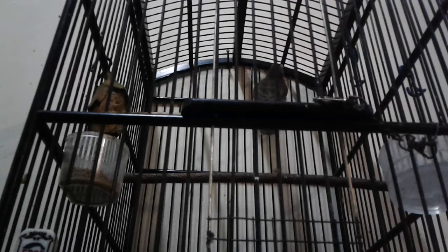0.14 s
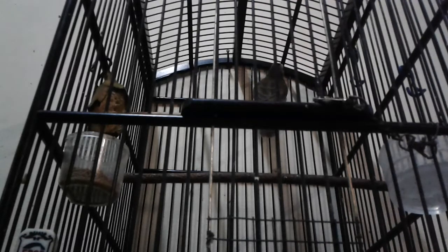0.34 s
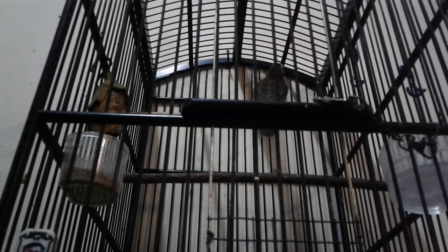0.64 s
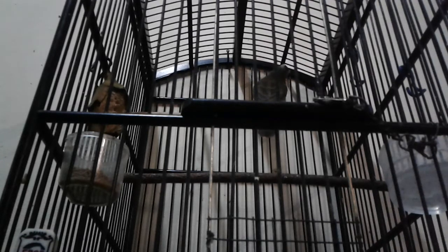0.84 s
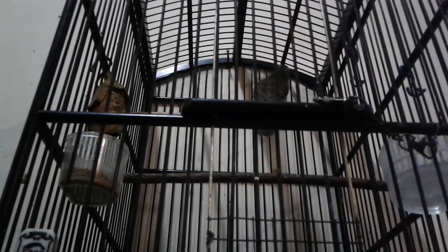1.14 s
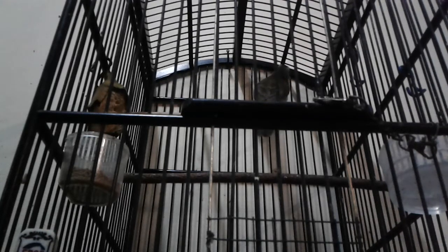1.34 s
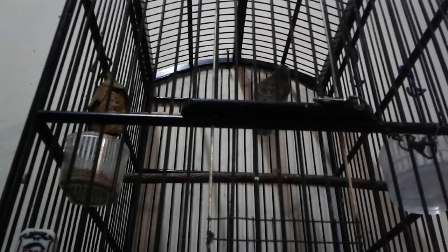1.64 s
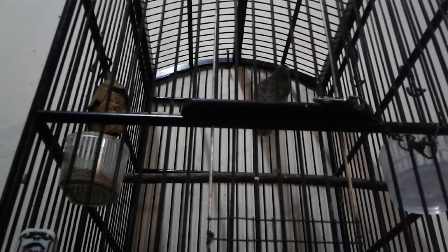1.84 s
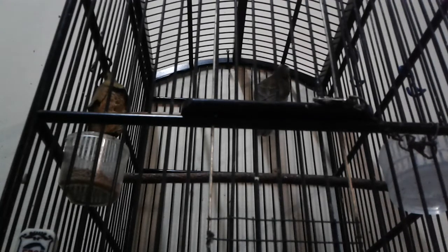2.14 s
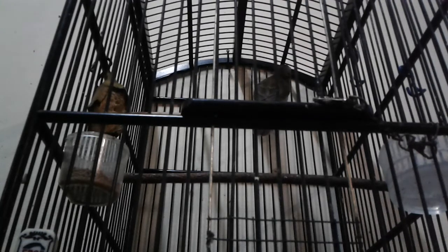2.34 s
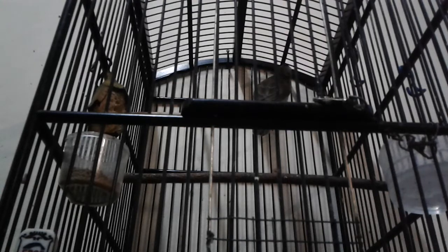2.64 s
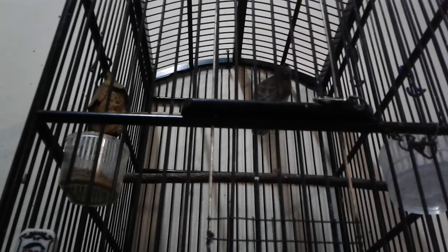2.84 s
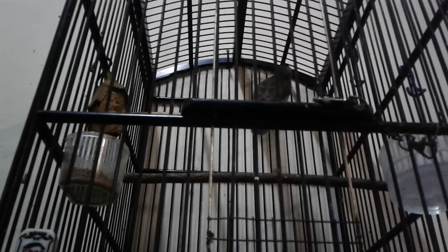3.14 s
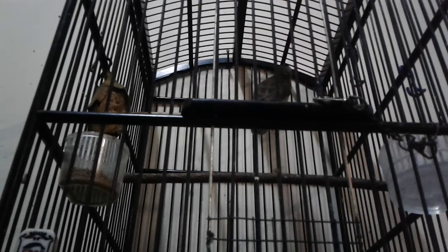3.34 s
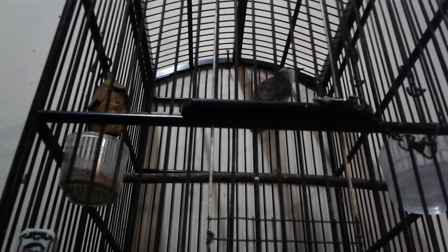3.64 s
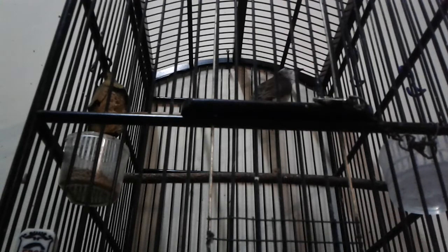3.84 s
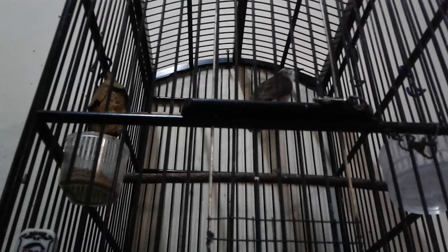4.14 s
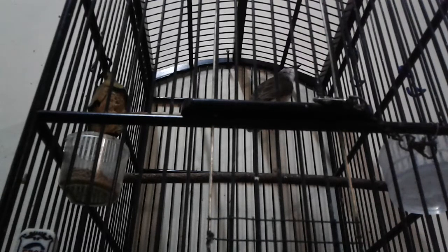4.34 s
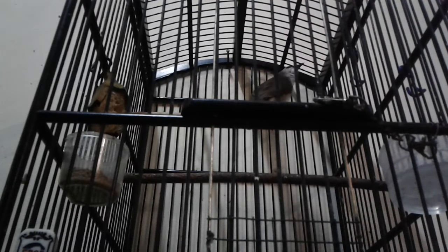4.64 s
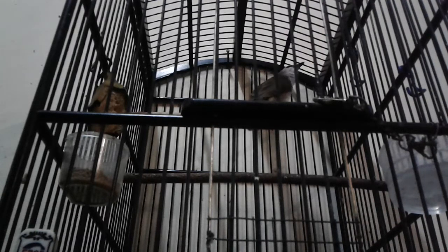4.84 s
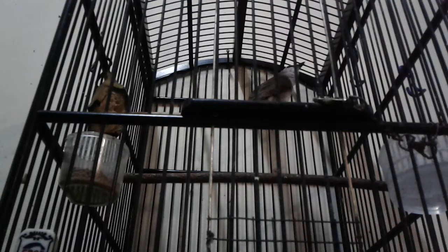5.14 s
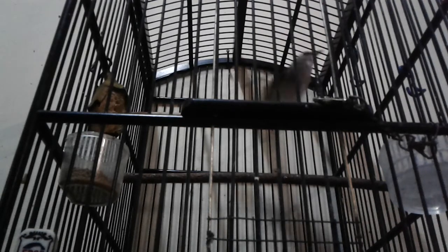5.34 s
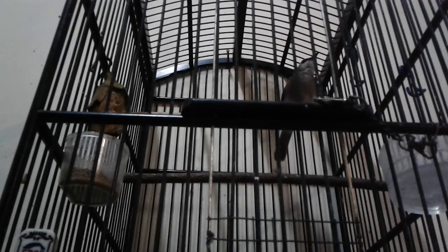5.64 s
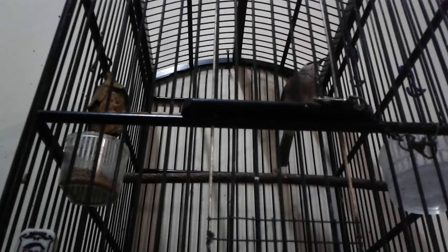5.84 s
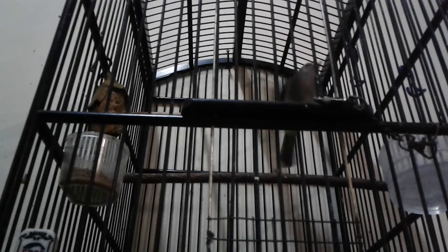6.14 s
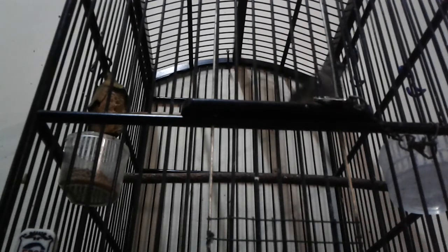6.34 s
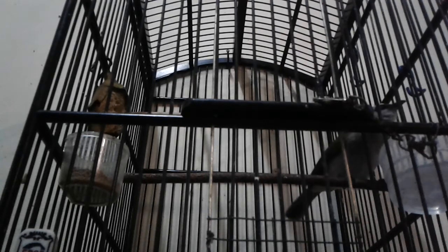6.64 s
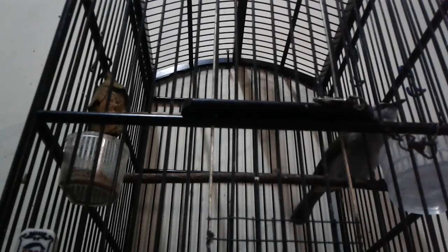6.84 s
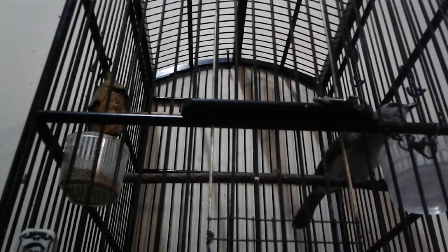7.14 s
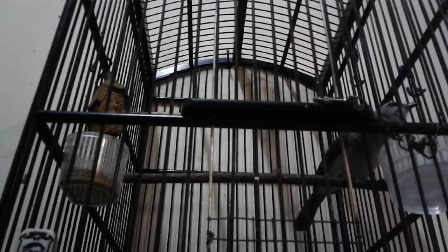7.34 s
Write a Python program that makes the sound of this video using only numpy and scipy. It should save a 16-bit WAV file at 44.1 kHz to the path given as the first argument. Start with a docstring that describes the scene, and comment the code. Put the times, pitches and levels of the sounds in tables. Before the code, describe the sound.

A caged songbird sings close to the microphone in a small hard-walled room with quick wall echoes and a short bright ring. From 0 to about 1.65 seconds it rattles off five similar phrases, roughly every 0.37 seconds: sharp noisy chip, high pip, loud downward slur, soft rise, raspy two-voiced twang and low fading drop; the first begins already underway. Between 1.85 and 2.75 another bird gives four faint rising-falling calls far off. Near-silence follows, with low air, distant traffic easing after 3, a faint sinking engine whine early, hum and wavering hiss. Slower whistles come at 3.75, 4.45 and 4.77-5.25, sweeping down, then swelling into rounded crests, the last loudest. A very faint distant chirp falls at 5.6. At 6.4-6.55 a hop makes tiny dry ticks, and a weak two-part falling whistle sounds at 6.7-6.8 before quiet room tone to about 7.5.

```python
"""In a hard-walled room a caged bulbul sings close by, over still air, distant traffic, a hum and hiss.
Five quick phrases are built of chip, pip, slur, lead, twang and drop; slower whistles follow, built of
sweep, slide, trough and arch. Each syllable is a gliding tone with faint overtones; the twang joins two.
Chips and twangs add bursts of noise, a hop gives dry ticks, and another bird calls faintly from afar.
Delayed copies form the first wall echoes, and decaying noise forms the ring of the room."""
import sys
import numpy as np
from scipy import signal
from scipy.fft import rfft, irfft, next_fast_len
from scipy.io import wavfile
from scipy.ndimage import uniform_filter1d

SR = 44100
rng = np.random.default_rng(int(sys.argv[2]) if len(sys.argv) > 2 else 0)


def master_out(mix):
    """Clip the mix to full scale and print it as 16-bit PCM to the path in sys.argv[1]."""
    frames = np.transpose(np.atleast_2d(mix))
    ceiling = np.clip(frames, -1, 1)
    pcm = np.round(ceiling * 32767).astype(np.int16)
    wavfile.write(sys.argv[1], SR, pcm)


N = 329427
TIME = np.arange(N) / SR  # seconds

# Noise colours, each scaled later to rms 1. Each row: frequency in Hz, relative density in dB.
AIR_COLOUR = [(15, -52.5), (25, -25.5), (48, -17.5), (115, -4), (152, -8), (205, -6.5), (350, -13.5),
              (500, -18), (1100, -28), (2000, -34), (2800, -31.5), (4300, -34.5), (9000, -63.5)]
HIGH_HISS_COLOUR = [(6000, -10), (9000, -9.5), (11000, -4.5), (13500, 0), (16000, 1)]
TRAFFIC_COLOUR = [(20, -51), (40, -30.5), (75, -7), (105, -15), (122, -0.5), (145, -9.5), (250, -12.5),
                  (450, -20), (900, -20), (2000, -16.5), (3500, -47.5)]
HISS_COLOUR = [(3000, -11.5), (4500, -6.5), (5400, 0.5), (6200, -3.5), (7000, -3.5), (7900, -11.5),
               (8800, -34.5)]
SIZZLE_COLOUR = [(2800, -26.5), (3500, 3), (4000, 3.5), (4500, -7), (5200, -35)]  # a lower band of hiss
SHRILL_COLOUR = [(4300, -37.5), (5050, -7.5), (5400, -2), (5750, -9), (6500, -37.5)]  # a thin far-off shrilling
KNOCK_COLOUR = [(900, -14), (1700, 8), (3000, -3), (5000, -12), (7500, 3), (11000, -14), (16000, -4)]  # claws on perch and bars
RASP_COLOUR = [(600, -12.5), (1500, -1), (3300, 14), (4500, 2), (5000, -3.5), (7700, -8), (8700, -22),
               (10200, -0.5), (11300, -6), (12600, -11.5), (13400, -18), (16000, -20)]

# Slow level curves of the background. Each row: time in seconds, level in dB.
TRAFFIC_LEVEL = [(0, -57.5), (.8, -55.5), (1.3, -55), (1.75, -53), (2.2, -56.5), (2.6, -56), (3.1, -70),
                 (4.4, -64.5), (5.1, -55.5), (5.7, -64), (6.4, -71.5), (7.47, -65)]
HISS_LEVEL = [(0, -72), (.7, -62.5), (1.75, -77.5), (2.0, -70.5), (2.8, -65.5), (3.5, -73), (4, -63),
              (4.5, -67.5), (5.3, -60), (5.8, -61.5), (6.15, -70.5), (7.47, -72)]  # before the trim in hiss()
SIZZLE_LEVEL = [(0, -72.5), (2, -66.5), (3.3, -87.5), (4.5, -70), (5.6, -61), (6.05, -78), (6.35, -83.5),
                (6.65, -73), (7.1, -69.5), (7.47, -65.5)]
SHRILL_LEVEL = [(0, -89), (2.3, -87), (2.75, -73.5), (3.3, -72), (3.6, -81), (7.47, -80)]  # before its flutter
# A far engine's whine. Each row: time in seconds, pitch in Hz, relative level in dB.
WHINE = [(0, 826, -67), (1.5, 803, -58), (1.9, 780, -57.5), (2.3, 711, -63.5), (2.6, 684, -68),
         (3, 675.4, -79.5), (7.47, 670, -97.5)]

# Nearby walls. Each row: echo delay in seconds, reflected share of the amplitude.
WALLS = [(.0031, .28), (.0052, .16), (.0094, .14), (.0128, .25), (.0183, .29), (.0229, .2)]
# Decay of the room. Each row: frequency in Hz, time to fall by 60 dB in seconds.
ROOM_T60 = [(700, 0.78), (1300, 0.72), (2400, 0.72), (5000, .58), (8000, 0.12), (14000, 0.27)]
# How strongly the room rings. Each row: frequency in Hz, gain in dB.
ROOM_COLOUR = [(900, 0), (1180, 1.5), (1450, 1), (1880, 4), (2080, 1.5), (2260, 4.5), (2360, 2),
               (2460, -3.5), (2760, -0.5), (3050, 0), (3450, 2), (10000, 0.5)]

# Overtones of the syrinx. Each row: frequency in Hz, level in dB against the fundamental before richness.
OVERTONES = [(2000, -26.5), (3800, -32), (5300, -47), (7000, -46.5), (8300, -47), (9300, -61.5),
             (10800, -42.5), (12500, -47), (13800, -48), (16000, -51)]
# Brightness as the beak opens and the head turns. Each row: time in seconds, overtone gain in dB.
BEAK = [(0, -10.5), (.7, -7), (1.45, -2.5), (3.8, -3), (4.6, -5), (4.9, -3), (5.2, -0.5), (6.8, -0.5)]
# The octave of a voice strained at the top of its range. Each row: pitch in Hz, octave level in dB.
SQUEAK = [(2900, -69.5), (3250, -34), (3550, -23)]

# Gestures. Each is a pair of lists at even steps through the syllable: pitch from 0 = low to 1 = high,
# then relative level in dB.
FAR_RISE = ([0, 0.48, 0.35, 0.96, 0.84], [0, -3, 0])
FAR_FALL = ([1, 0.567, 0.363, 0.31, 0], [-1, 0, -0.5])
CHIP = ([1, .6, .2, .25, .65, 0.88, 1], [-13.5, -6, -16, -7.5, 0.5, -14.5])  # a flick down and back up
PIP = ([1, 0.96, 0.57, 0.5, 0], [-10, -8.5, 0])  # high, then falling
SLUR = ([0.86, .5, .15, 0.0078, .08], [-9.5, 0, -1.4])  # a loud fall that flattens out
LEAD = ([.1, .2, .45, .6, 1], [-4, -3, 0])  # a soft rise before the twang
SCOOP = ([0.299, 0.071, .12, .5, 1], [-9, -15, 0])  # the side of the syrinx that dips, then rises in the twang
PLUNGE = ([.85, 0.96, .7, .4, 0], [-12.5, 0, -1])  # the side that plunges just after
DROP = ([0.94, 0.99, .75, .4, 0], [0, -7.5, -21])  # the low fading end of a phrase
SWEEP = ([0.99, .8, .6, 0.25, 0.014], [-11.5, 0, -6])  # the long fall that opens a whistle
SLIDE = ([0.94, 0.71, 0.51, .25, 0.061], [-10, 0, -5])  # a short swelling fall
TROUGH = ([.8, .4, 0, .1, 1], [-2, -3, 0])  # the low link from slide to arch
ARCH = ([0, .9, 1, 1, .88, .5, .15, .1], [-4.5, -2, 0])  # the loud crest of a whistle

# The far bird's calls. Each row: start in seconds, level in dB before the room, start Hz, top Hz of the rise.
FAR_CALLS = [(1.858, -46.5, 3070, 3550), (2.100, -49, 2800, 3435), (2.346, -48.5, 2577, 3514),
             (2.610, -49, 2730, 3260)]
# Its one sweep: start in seconds, length in seconds, low Hz, high Hz, level in dB before the room.
FAR_SWEEP = (5.585, .032, 1400, 2200, -44)
# Claws and feathers against the cage. Each row: start in seconds, level in dB before the trim in hop().
TICKS = [(6.3979, -59.5), (6.419, -63), (6.4688, -63.5), (6.507, -52.5), (6.5508, -73)]

# Plain syllables. Each row: start in seconds, length in seconds, low Hz, high Hz, level in dB.
PIPS = [(-.012, 0.02, 3171, 3350, -19), (.293, 0.031, 3393, 3500, -26.5), (.673, 0.0075, 3120, 3330, -17),
        (1.064, .012, 3200, 3386, -17), (1.434, 0.031, 3376, 3667, -28)]
LEADS = [(.065, 0.026, 1768, 1931, -25), (.410, 0.023, 1807, 2013, -26.5), (.776, 0.022, 1710, 1921, -23.5),
         (1.151, .024, 1343, 1940, -24), (1.523, 0.021, 1898, 2067, -26)]
DROPS = [(.134, 0.044, 798, 1177, -26.5), (.479, .051, 854, 1183, -28), (.853, 0.043, 759.8, 1183, -28.5),
         (1.245, 0.028, 1030, 1368, -22), (1.596, 0.045, 773, 1179, -28)]
TROUGHS = [(3.833, .018, 1990, 2287, -29), (4.574, .017, 2160, 2220, -24.5),
           (5.186, .022, 2074, 2328, -18.5)]
# Chips. Each row: the same five columns, then the rasp level in dB as fed to the room.
CHIPS = [(.256, 0.014, 1957, 3078, -12, -51.5), (.624, .019, 1694, 3347, -16.5, -40.5),
         (1.016, .017, 1410, 3230, -21.5, -41), (1.384, 0.0144, 2080, 3197, -14.5, -52.5)]
# Swelling syllables. Each row: the same five columns, delay of the glide (1 = even), swell in dB.
SLURS = [(-.008, 0.034, 2146, 2950, -17.5, 1.2, -8), (.320, .027, 2365, 3070, -17.5, .85, 3),
         (.691, 0.024, 2368, 2960, -10.5, 0.88, 2.5), (1.084, .016, 2320, 3430, -17.5, 1.15, 9.5),
         (1.449, .014, 2290, 3476, -14, 1.48, -8)]
SWEEPS = [(3.744, 0.042, 1250, 2154, -33.5, 0.89, 1.2), (4.466, .036, 1227, 2400, -32, 0.86, 1),
          (4.770, 0.04, 1259, 2147, -25, 1.28, 0), (5.066, .036, 1542, 1890, -24.5, 1.5, 2.5),
          (6.680, .037, 1115, 1845, -32, 2.1, 0)]
SLIDES = [(3.811, 0.02, 2202, 2425, -25.5, 1.56, 3), (4.543, 0.018, 2177, 2550, -24, 1.28, 7),
          (4.857, 0.026, 2015, 2400, -16.5, 1.47, -7), (5.165, .020, 2216, 2586, -13.5, 1.05, 0),
          (6.769, 0.0217, 2047, 2555, -27.5, 0.987, 1)]
ARCHES = [(3.852, 0.041, 2203, 2730, -21.5, 1.04, 4), (4.582, 0.054, 2308, 2750, -22.5, .72, 12),
          (4.909, 0.042, 2308, 2580, -15, .6, 9), (5.205, .046, 2534, 2805, -11.5, 1.4, -2)]
# Twangs. Each row: start in seconds, lag of the plunge in seconds, scoop level in dB, plunge level in dB.
TWANGS = [(.088, .012, -14, -21.5), (.435, 0.0046, -18, -19.5), (.794, .007, -18, -18),
          (1.177, .007, -18.5, -18), (1.547, 0.017, -17.5, -20.5)]


def amp(db):
    """Logarithmic level: decibels become an amplitude factor."""
    return 10 ** (np.asarray(db) / 20)


def unit(x):
    """Normalisation: the mean power is brought to 1."""
    return x / np.sqrt(np.mean(x ** 2) + 1e-20)


def read(points, hz):
    """Interpolation of a spectrum along a log-frequency axis."""
    f, value = np.transpose(points)
    return np.interp(np.log(hz + 1), np.log(f), value)


def follow(rows):
    """Linear interpolation in time: each column of a curve at every sample."""
    s, *columns = np.transpose(rows)
    return [np.interp(TIME, s, column) for column in columns]


def add(mix, s, sound):
    """Superposition: a sound is summed in at time s, less any part before zero."""
    at = round(s * SR)
    sound = sound[max(-at, 0):]
    part = mix[max(at, 0):][:len(sound)]
    part += sound[:len(part)]


def noise(colour):
    """Spectral shaping: white noise is filtered to a given colour at rms 1."""
    size = next_fast_len(N)
    hz = np.fft.rfftfreq(size, 1 / SR)
    spectrum = rfft(rng.standard_normal(size)) * amp(read(colour, hz))
    return unit(irfft(spectrum, size))[:N]


def wander(n, rate_hz):
    """Low-pass filtering: white noise becomes a smooth random drift, scaled to rms 1."""
    size = next_fast_len(max(n, SR // 10))
    hz = np.fft.rfftfreq(size, 1 / SR)
    spectrum = rfft(rng.standard_normal(size)) * np.exp(-(hz / rate_hz) ** 2)
    return unit(irfft(spectrum, size))[:n]


def still_air(air_db=-59, high_hiss_db=-81):
    """Stationary noise: a low-weighted bed of air and a faint high hiss keep constant level."""
    return noise(AIR_COLOUR) * amp(air_db) + noise(HIGH_HISS_COLOUR) * amp(high_hiss_db)


def traffic(firing_hz=117):
    """Noise plus tone: rumble is joined by an engine's firing note of wandering phase."""
    engine = np.sin(2 * np.pi * firing_hz * TIME + 0.68 * wander(N, 4))
    level_db, = follow(TRAFFIC_LEVEL)
    return unit(noise(TRAFFIC_COLOUR) + .5 * engine) * amp(level_db)


def engine_whine():
    """Amplitude modulation: random drift widens a sinking sine into a narrow band."""
    hz, level_db = follow(WHINE)
    carrier = np.sin(2 * np.pi * np.cumsum(hz) / SR)
    return unit(wander(N, 100) * carrier) * amp(level_db)


def hum(hz=199, db=-71):
    """Phase modulation: a steady sine wavers slightly by a slow random phase."""
    return amp(db) * unit(np.sin(2 * np.pi * hz * TIME + 0.69 * wander(N, 3)))


def hiss(trim_db=-2):
    """Band-shaped noise: two bands rise and fall in level independently."""
    hiss_db, = follow(HISS_LEVEL)
    sizzle_db, = follow(SIZZLE_LEVEL)
    return noise(HISS_COLOUR) * amp(hiss_db + trim_db) + noise(SIZZLE_COLOUR) * amp(sizzle_db)


def shrilling(flutter_db=2):
    """Random amplitude modulation: a narrow band of noise flutters in level."""
    level_db, = follow(SHRILL_LEVEL)
    return noise(SHRILL_COLOUR) * amp(level_db + flutter_db * wander(N, 15))


def background():
    """Superposition of independent sources: air, traffic, whine, hum, hiss and shrilling."""
    return still_air() + traffic() + engine_whine() + hum() + hiss() + shrilling()


def walls(x):
    """Specular reflection: each nearby surface returns a delayed, weaker copy."""
    out = np.zeros(N)
    for delay, share in WALLS:
        add(out, delay, share * x)
    return out


def room(x, gap_s=0.0047, build_s=0.015):
    """Reverberation: dense echoes build up, then each band decays at its own rate."""
    hz, t, bands = signal.stft(rng.standard_normal(SR), SR, nperseg=256)
    decay = amp(-60 * t / read(ROOM_T60, hz)[:, None])
    tail = signal.istft(bands * decay, SR, nperseg=256)[1][:SR]
    build_up = np.clip((TIME[:SR] - gap_s) / build_s, 0, 1)
    spectrum = rfft(tail * build_up, 2 * SR)
    spectrum /= np.sqrt(uniform_filter1d(abs(spectrum) ** 2, size=240))  # even, before the colouring
    spectrum *= amp(read(ROOM_COLOUR, np.fft.rfftfreq(2 * SR, 1 / SR)))
    response = irfft(spectrum)[:SR] * (TIME[:SR] > gap_s)
    return signal.fftconvolve(x, response)[:N]


def note(gesture, s, length, low_hz, high_hz, db, delay=1, swell_db=0,
         jitter=0.00092, shimmer=0.039, edge_s=0.0024, pressing=0.086):
    """Frequency modulation with harmonics: louder notes and an open beak enrich the overtones."""
    u = np.linspace(0, 1, int(length * SR))
    pitches, levels = gesture
    # a delay above 1 holds the first pitch longer
    height = np.interp(u ** delay, np.linspace(0, 1, len(pitches)), pitches)
    height = uniform_filter1d(height, size=len(u) // 6, mode="nearest")  # muscles round off the turns
    hz = (low_hz + (high_hz - low_hz) * height) * (1 + jitter * wander(len(u), 200))
    phase = 2 * np.pi * np.cumsum(hz) / SR

    level_db = db + swell_db * (u - .5) + np.interp(u, np.linspace(0, 1, len(levels)), levels)
    edge = np.clip(np.minimum(u, 1 - u) * length / edge_s, 0, 1)
    gate = np.sin(np.pi / 2 * edge) ** 2

    overtones = np.zeros(len(u))
    for k in range(2, 11):
        audible = k * hz < SR / 2  # nothing above half the sample rate
        overtones += amp(read(OVERTONES, k * hz)) * audible * np.sin(k * phase)
    beak_db = np.interp(s, *np.transpose(BEAK))
    richness = amp(beak_db + pressing * (level_db + 16.5))
    squeak = amp(read(SQUEAK, hz)) * np.sin(2 * phase)
    tone = np.sqrt(2) * (np.sin(phase) + richness * overtones + squeak)
    return s, tone * gate * amp(level_db) * (1 + shimmer * wander(len(u), 170))


def far_bird(waver=.033):
    """Frequency modulation: four calls rise and then fall, and a single sweep comes later."""
    rise_s, fall_s, fall_hz = 0.0481, 0.045, (2367, 2800)
    fall_after_s = .063  # from the start of the rise
    out = np.zeros(N)
    for s, db, start_hz, top_hz in FAR_CALLS:
        add(out, *note(FAR_RISE, s, rise_s, start_hz, top_hz, db, jitter=waver))
        add(out, *note(FAR_FALL, s + fall_after_s, fall_s, *fall_hz, db, jitter=waver))
    add(out, *note(SWEEP, *FAR_SWEEP, jitter=waver))
    return out


def hop(trim_db=-3, decay_s=0.0042):
    """Impact excitation: claws and feathers give short, exponentially dying ticks of noise."""
    force, t = np.zeros(N), np.arange(SR // 20) / SR
    for s, db in TICKS:
        add(force, s, amp(db + trim_db) * np.exp(-t / decay_s))
    return force * noise(KNOCK_COLOUR)


def rasp(grain=.3, early_s=0.0015, twang_s=.026, twang_db=-20.5):
    """Chaotic vibration: every chip and twang breaks into a fluttering burst of noise."""
    bursts = [(s - early_s, length, db) for s, length, *_, db in CHIPS]
    bursts += [(s, twang_s, plunge_db + twang_db) for s, *_, plunge_db in TWANGS]
    effort = np.zeros(N)
    for s, length, db in bursts:
        add(effort, s, amp(db) * signal.windows.tukey(int(length * SR), .6))
    flutter = np.exp(grain * wander(N, 400))
    return effort * unit(noise(RASP_COLOUR) * flutter)


def twang(out, jitter):
    """Two-voice production: one side of the syrinx scoops up, the other plunges just after."""
    scoop_s, scoop_hz = .02, (1214, 2400)
    plunge_s, plunge_hz = .017, (1407, 2757)
    for s, lag, scoop_db, plunge_db in TWANGS:
        add(out, *note(SCOOP, s, scoop_s, *scoop_hz, scoop_db, jitter=jitter))
        add(out, *note(PLUNGE, s + lag, plunge_s, *plunge_hz, plunge_db, jitter=jitter))


def sing(pure=0.00092, chatter=.006, sweeping=.008, harsh=0.026):
    """Pitch perturbation: syllables range from pure whistles to harsh chips, by rms pitch jitter."""
    kinds = [
        (PIP, PIPS, pure), (SLUR, SLURS, pure), (SLIDE, SLIDES, pure),
        (TROUGH, TROUGHS, pure), (ARCH, ARCHES, pure),
        (LEAD, LEADS, chatter), (DROP, DROPS, chatter), (SWEEP, SWEEPS, sweeping),
        (CHIP, [row[:5] for row in CHIPS], harsh),  # the rasp column is left to rasp()
    ]
    out = np.zeros(N)
    for gesture, rows, jitter in kinds:
        for row in rows:
            add(out, *note(gesture, *row, jitter=jitter))
    twang(out, harsh)
    return out


def scene(room_db=-3.0, far_db=-1, rasp_direct=0.68):
    """Direct and reverberant fields: rasps reach us more by the room, the far bird only by it."""
    far = amp(far_db) * room(far_bird())
    clear, harsh = sing() + hop(), rasp()
    near = clear + rasp_direct * harsh
    ring = amp(room_db) * room(clear + harsh)
    return (background() + far + ring + walls(near) + near)[None]


def record(dry, edge_hz=15750):
    """Band limitation: a linear-phase low-pass removes the highest treble."""
    low_pass = signal.firwin(511, edge_hz, window=("kaiser", 9), fs=SR)
    return signal.oaconvolve(dry, low_pass[None], "same")


dry = scene()
out = record(dry)
master_out(out)
```